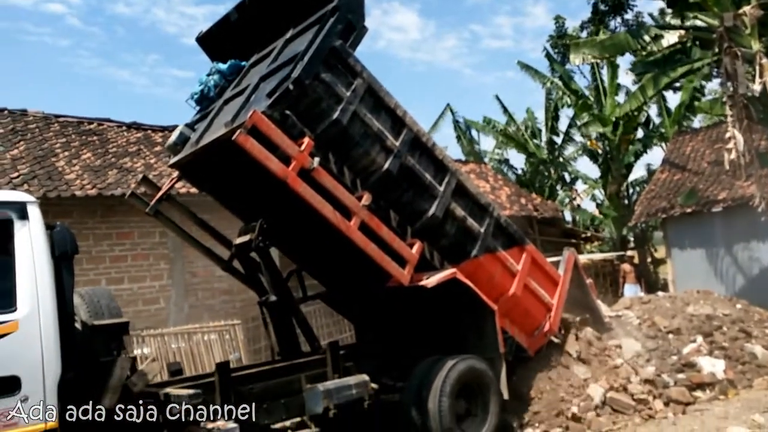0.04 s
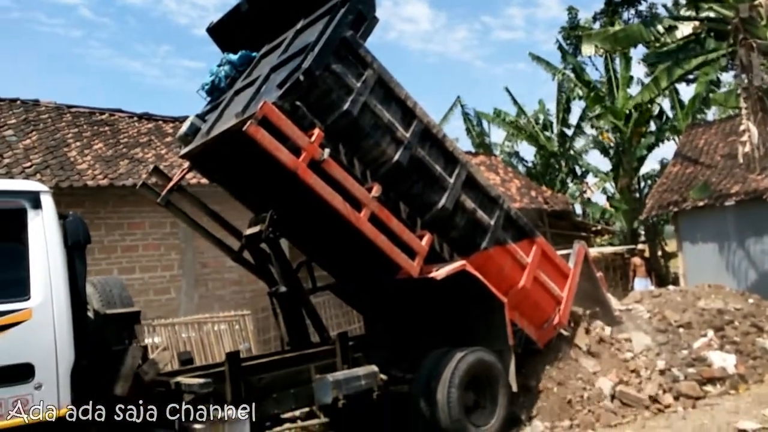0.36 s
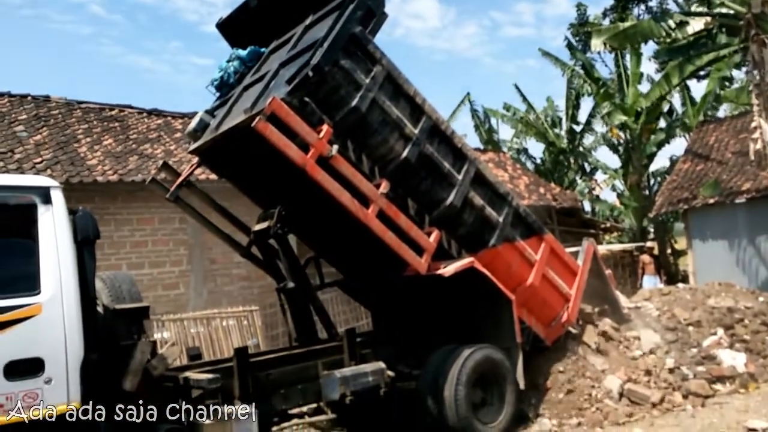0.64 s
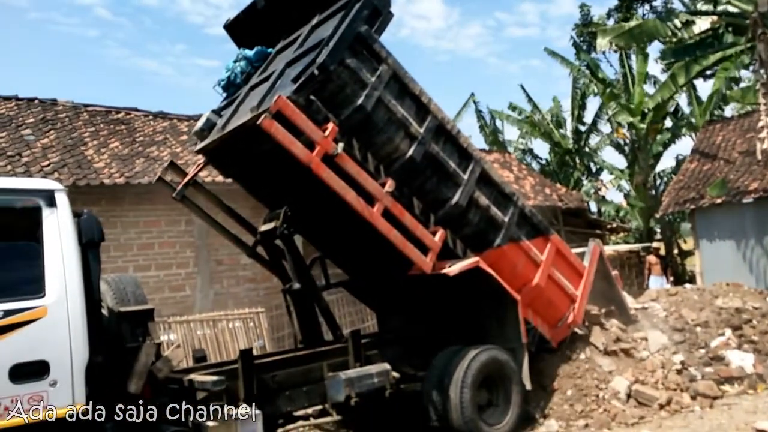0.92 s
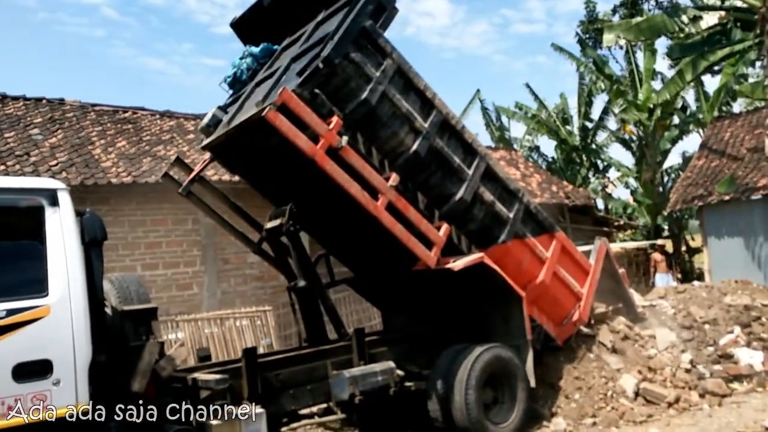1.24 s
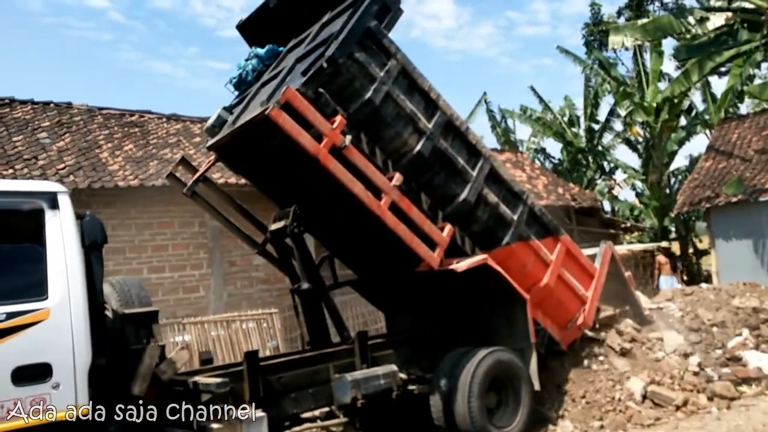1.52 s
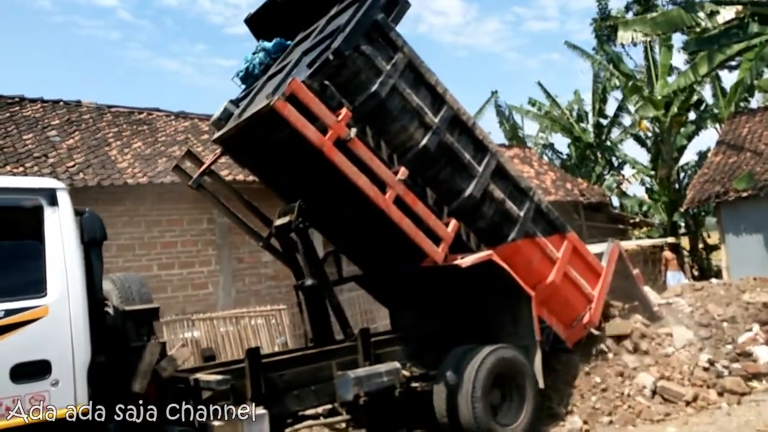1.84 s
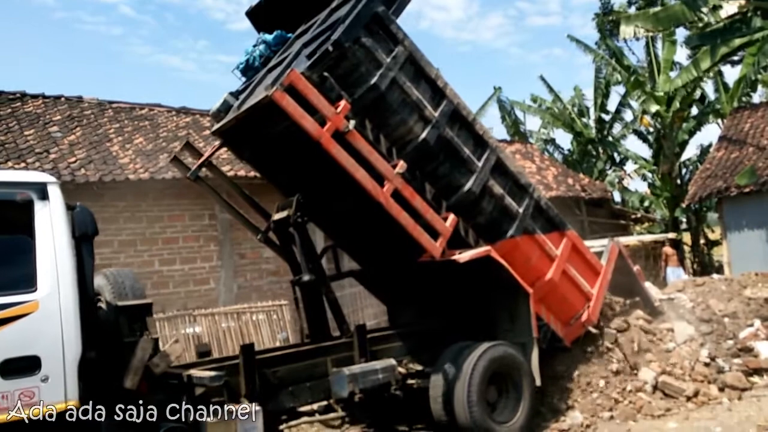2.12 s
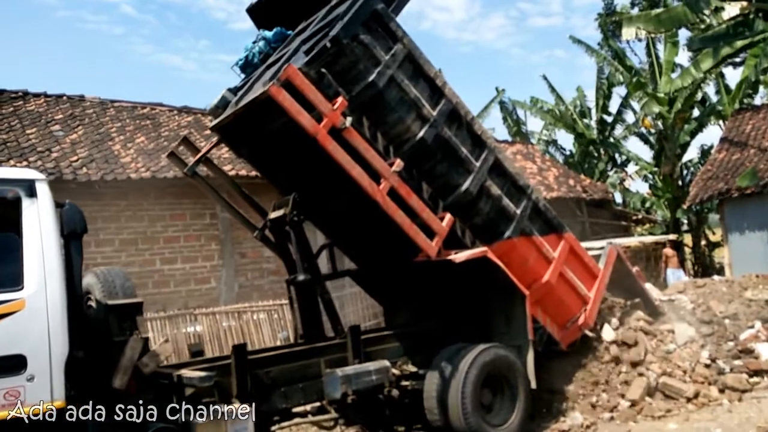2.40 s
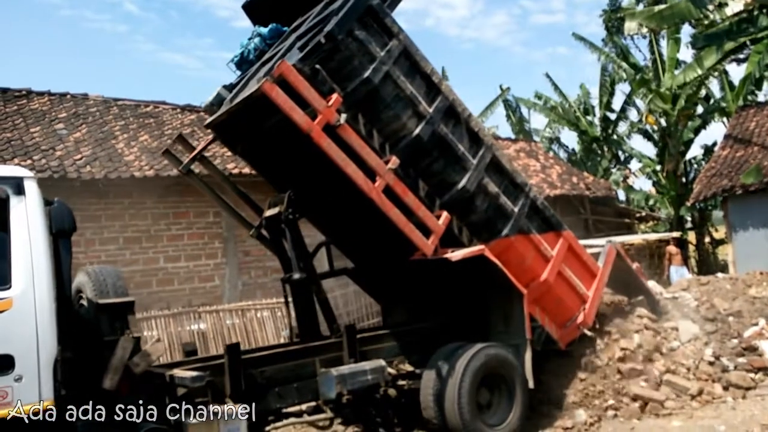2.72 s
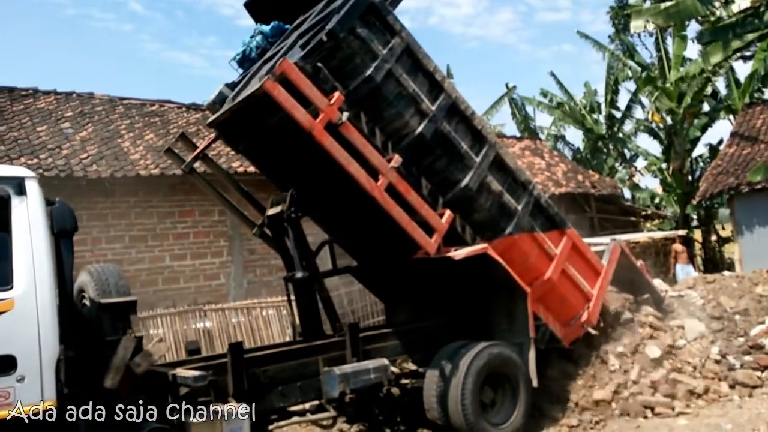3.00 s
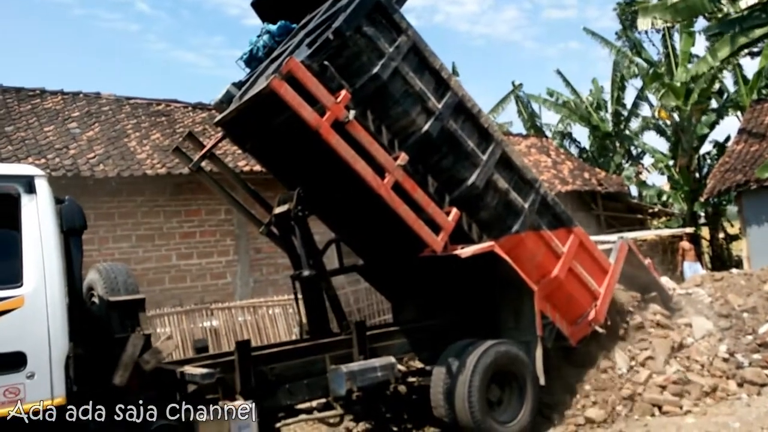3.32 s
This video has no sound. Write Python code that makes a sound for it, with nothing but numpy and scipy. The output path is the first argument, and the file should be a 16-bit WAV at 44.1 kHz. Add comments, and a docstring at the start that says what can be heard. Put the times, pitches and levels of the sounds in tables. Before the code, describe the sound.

Rubble slides off a tipper truck's steel bed outdoors, over a faint diesel idle. In the first second the bed groans briefly and gives dull thumps. Stones come loose around 1.2 seconds. From 1.7 seconds rubble and earth rush down, drumming and scraping, with gravel spraying and bricks clacking, fullest around 2.5 seconds. Heavy lumps knock the steel at about 3 and 3.2 seconds, then the flow dies away.

```python
"""A diesel tipper truck idles outdoors while the load on its raised steel bed thumps and groans.
A few stones come loose, then rubble and earth rush down, drumming, scraping and ringing the steel.
Gravel sprays over the tail, bricks clack and earth slumps onto the heap; the last big lumps drop
and the flow dies away. Nearby house walls give a short echo. The sound is mono, with a dull top."""
import sys
import numpy as np
from scipy import signal
from scipy.fft import rfft, irfft
from scipy.io import wavfile

SR = 44100
rng = np.random.default_rng(int(sys.argv[2]) if len(sys.argv) > 2 else 0)


def bounce(signal):
    """Save signal as a 16-bit WAV file at the path given by the first command-line argument."""
    frames = np.transpose(np.atleast_2d(signal))
    limited = np.clip(frames, -1, 1)
    pcm = np.round(limited * 32767).astype(np.int16)
    wavfile.write(sys.argv[1], SR, pcm)


N = 156555
T = np.arange(N) / SR
HIT_T = T[:SR // 2]  # half a second: the time axis of one hit


def undb(db):
    """Decibels to gain."""
    return 10 ** (np.asarray(db) / 20)


def unit(x):
    """Scale to rms 1."""
    return x / np.sqrt(np.mean(x ** 2))


def colour(x, points, size=8192):
    """Causal EQ through (Hz, dB) points, with an added treble roll-off; the result has rms 1."""
    hz, db = np.array(points, float).T
    freqs = np.maximum(np.fft.rfftfreq(size, 1 / SR), 1)
    gain = undb(np.interp(np.log(freqs), np.log(hz), db)) / (1 + (freqs / hz[-1] / 2) ** 2)
    cepstrum = irfft(np.log(gain))
    response = irfft(np.exp(rfft(2 * cepstrum[:size // 2], size)))  # minimum phase keeps attacks sharp
    return unit(signal.fftconvolve(x, response)[:N])


def noise(points):
    """Coloured noise of rms 1."""
    return colour(rng.standard_normal(N), points)


def wander(hz):
    """Smooth random motion of rms 1, up to about hz."""
    return unit(signal.sosfilt(signal.butter(2, hz, fs=SR, output="sos"), rng.standard_normal(N)))


def fade(t60):
    """An exponential decay that loses 60 dB in t60 seconds."""
    return np.exp(-np.log(1000) * HIT_T / t60)


def ring(hz, t60):
    """One struck mode."""
    return np.sin(2 * np.pi * hz * HIT_T) * fade(t60)


def contact(rise_s=0.0013):
    """A rounded attack: a crumbling stone or lump takes a moment to make full contact."""
    return 1 - np.exp(-(HIT_T / rise_s) ** 2)


def crack(hiss, t60):
    """Crumbling stone: a dying burst cut from a random place in the hiss."""
    return np.roll(hiss, rng.integers(N))[:len(HIT_T)] * fade(t60)


def grains(per_s, spread_db):
    """Random impacts; a positive spread makes a few stand out, a negative one makes a few weaker."""
    size = undb(spread_db * np.minimum(rng.exponential(size=N), 5))
    return (rng.random(N) < per_s / SR) * size * rng.choice([-1, 1], N)


def add(out, start, sound):
    """Mix a sound in at start seconds."""
    i = max(int(start * SR), 0)
    out[i:i + len(sound)] += sound[:max(N - i, 0)]


# The hum of the exhaust. Each row: multiple of the firing rate, level in dB.
EXHAUST_HARMONICS = [(3, -76.5), (4, -82.5), (5, -81), (7, -76)]
# The tone of the diesel clatter and of the block and chassis. Each row: frequency in Hz, gain in dB.
CLATTER_EQ = [(300, -15.5), (480, -1.5), (680, -19.5), (950, 1), (1250, -2), (1800, -17), (2600, -14),
              (3400, -12.5), (4700, -28.5), (5700, -20), (7000, -40), (8000, -50)]
RUMBLE_EQ = [(28, -41), (45, -8), (80, 0), (140, -8), (220, -3.5), (380, -9), (520, -10), (700, -28),
             (1000, -32)]

def engine(firing_hz=23.05, first_firing_s=0.04, burst_decay_s=0.0059):
    """Idling diesel: the exhaust hums, and each firing kicks up the clatter and the chassis rumble."""
    firings = (T - first_firing_s) * firing_hz
    burst = np.exp(-(firings % 1) / firing_hz / burst_decay_s)
    strength = undb(0.5 * rng.standard_normal(200))[np.floor(firings).astype(int) + 1]
    clatter, rumble = (0.67 + burst * strength) * rng.standard_normal((2, N))  # steady floor plus bursts
    exhaust = sum(undb(db) * np.sqrt(2) * np.sin(2 * np.pi * (harmonic * firings + rng.random()))
                  for harmonic, db in EXHAUST_HARMONICS)
    return exhaust + undb(-66) * colour(clatter, CLATTER_EQ) + undb(-62) * colour(rumble, RUMBLE_EQ)


# The swell and ebb of the sliding load.
# Each row: time in seconds, bed drumming in dB, rubble scraping in dB, grit hiss in dB.
FLOW_LEVELS = [(0, -57.5, -93, -70), (0.798, -71.5, -69.5, -85), (1.155, -58.5, -61.5, -72.5),
               (1.179, -39, -43, -81), (1.26, -52, -56, -67), (1.35, -51.5, -51, -72.5),
               (1.491, -60, -63, -72.5), (1.601, -48.5, -55, -66.5), (1.659, -63, -74, -68.5),
               (1.7, -43, -60, -56), (1.832, -42, -47.5, -61.5), (1.982, -43, -43.5, -54),
               (2.15, -40.5, -42, -54), (2.32, -44, -46, -51.5), (2.44, -39.5, -40, -45.5),
               (2.529, -32, -39.5, -47.5), (2.63, -37.5, -38.5, -45), (2.76, -37.5, -41, -49),
               (2.92, -38, -46, -51), (3.009, -37.5, -47.5, -58), (3.07, -46.5, -54, -60.5),
               (3.181, -54.5, -63, -68), (3.271, -47.5, -55, -70.5), (3.4, -55.5, -61.5, -70.5),
               (3.55, -60.5, -73, -71.5)]
# The tone of the drumming, the scraping and the hiss. Each row: frequency in Hz, gain in dB.
DRUM_EQ = [(40, -35.5), (110, -22.5), (145, -12.5), (180, -13), (240, -2.5), (290, 0), (335, 4),
           (390, -5.5), (450, -2.5), (520, -13.5), (900, -50.5)]
SCRAPE_EQ = [(350, -27), (600, -1), (700, 1.5), (760, 2), (815, 9), (900, 3), (1040, 1), (1250, -21.5),
             (1600, -17.5), (2400, -61)]
GRIT_EQ = [(900, 0.5), (1400, 0), (1830, -2), (1960, 3.5), (2250, -2.5), (2480, -5.5), (2850, -4.5),
           (3250, 5.5), (3800, -3), (4150, 1.5), (5200, -7), (5700, -7.5), (6900, -29.5), (7800, -51.5)]

def slide(clump_db=2.2, clump_hz=30):
    """Showers of lumps, stones and grit run over the steel in clumps."""
    times, drum_db, scrape_db, grit_db = np.array(FLOW_LEVELS).T
    showers = [(drum_db, grains(per_s=500, spread_db=3), DRUM_EQ),
               (scrape_db, grains(per_s=1500, spread_db=-1), SCRAPE_EQ),
               (grit_db, grains(per_s=4400, spread_db=-1), GRIT_EQ)]
    out = np.zeros(N)
    for db, hits, eq in showers:
        clumped = hits * undb(clump_db * wander(clump_hz))
        out += undb(np.interp(T, times, db)) * colour(clumped, eq)
    return out


# The ring of the steel bed. Each row: frequency in Hz, level in dB, time to fall 60 dB in seconds.
BED_MODES = [(421, -4, 0.13), (591, -10, 0.21), (693, -7.5, 0.14), (810.8, 4, 0.083), (994, -4, 0.029),
             (1448, -21, 0.22), (1950, -19.5, 0.15), (2467, -13.5, 0.086), (3266, -4, 0.044),
             (3455, -18.5, 0.055)]
# The bright crunch of crumbling stone. Each row: frequency in Hz, gain in dB.
CRACK_EQ = [(500, -1.5), (1000, 3.5), (1500, 10), (2500, 7), (3300, 12), (4500, 3.5), (5800, -4),
            (7000, -17.5), (7900, -41.5)]

def chunks(count=560, low_hz=750, high_hz=4200, longest_t60=0.056, rest_db=-71):
    """Loose chunks tumble with the flow, clicking and crunching; each rings the bed at its own spot."""
    out, onset, hiss = np.zeros(N), contact(), noise(CRACK_EQ)
    times, _, _, grit_db = np.array(FLOW_LEVELS).T
    steel_modes = np.array([undb(db - 2) * ring(hz, t60) for hz, db, t60 in BED_MODES])
    draws = rng.random((count, 4))
    spots = rng.standard_normal((count, len(BED_MODES)))  # how much each hit drives each mode
    for (when, pitch, softness, detune), spot in zip(draws, spots):
        start = when * N / SR
        hz = low_hz * (high_hz / low_hz) ** pitch
        t60 = longest_t60 * (1 - pitch / 2)  # small, high chunks ring most briefly
        push_db = np.interp(start, times, grit_db) + 3.5 - 2.9 * np.log(softness + 0.03)
        click = ring(hz, t60) - ring(hz * (1 + 0.2 * detune), t60)
        crunch = undb(-7) * crack(hiss, t60)
        if push_db > rest_db:  # weakly pushed chunks stay put
            add(out, start, undb(push_db) * onset * (click + crunch + spot @ steel_modes) / 2)
    return out


# Dull knocks on the bed.
# Each row: start in seconds, pitch in Hz, level in dB, time to fall 60 dB in seconds.
THUMPS = [(0.088, 229, -28.5, 0.12), (0.090, 350, -24.5, 0.02), (0.329, 217, -34.5, 0.086),
          (0.69, 337.6, -30.5, 0.13), (0.6976, 308, -13, 0.024), (.723, 371.6, -39.5, 0.12),
          (0.898, 274, -27, 0.027), (1.164, 315, -21.5, 0.048), (1.255, 330, -33.5, .06),
          (1.68, 333.6, -32, 0.12), (1.958, 282, -24.5, 0.049), (2.242, 299, -21.5, 0.042),
          (2.361, 264, -22.5, 0.057), (2.492, 345, -18, 0.082), (2.493, 143.4, -32, 0.19),
          (2.567, 296, -14, 0.024), (2.595, 331, -22.5, 0.094), (2.886, 293, -21, 0.057),
          (2.952, 298, -14.5, 0.056), (2.978, 272, -25, 0.11), (3.023, 315, -27.5, 0.061),
          (3.205, 348, -10.5, 0.045), (3.208, 423, -26, 0.14), (3.217, 252.4, -26, 0.16),
          (3.228, 320, -15, 0.03), (3.261, 232.6, -29.5, 0.11), (3.484, 360, -30, 0.029)]

def thumps():
    """Soft, heavy lumps push the loaded floor, which rings briefly."""
    out = np.zeros(N)
    for start, hz, db, t60 in THUMPS:
        add(out, start, undb(db) * ring(hz, t60) * contact(rise_s=0.0035))
    return out


# Short groans of the bed under the sticking load.
# Each row: start in seconds, rise in seconds, length in seconds, pitch in Hz, level in dB.
GROANS = [(0.094, 0.014, 0.11, 354, -25), (0.194, 0.016, 0.049, 383.4, -41),
          (0.235, 0.021, 0.096, 349, -40.5), (0.322, 0.022, 0.073, 423, -40)]
# The rough edge of a groan. Each row: frequency in Hz, gain in dB.
RASP_EQ = [(80, -20), (200, 4.5), (300, 8.5), (480, 0.5), (750, -15.5), (1050, -10), (1400, -29.5),
           (3000, -36), (6000, -49), (8000, -71)]

def groans(upper_hz=965, upper_db=-34.5, rasp_db=-9):
    """Stick-slip friction holds a low panel mode, with a weaker upper mode and some rasp."""
    out, rasp = np.zeros(N), undb(rasp_db) * noise(RASP_EQ)
    for start, rise, length, hz, db in GROANS:
        age = T - start
        attack = np.sin(np.pi / 2 * np.clip(age / rise, 0, 1))
        release = np.clip((length - age) / (length - rise), 0, 1) ** 1.07
        panel = np.sin(2 * np.pi * hz * age) + undb(upper_db) * np.sin(2 * np.pi * upper_hz * age)
        out += undb(db) * attack * release * (np.sqrt(2) * panel + rasp)
    return out


# Bricks knocking together on the heap. Each row: start in seconds, pitch in Hz, level in dB.
CLACKS = [(.562, 1050, -57), (.912, 1178, -52), (1.041, 945, -49.5), (1.088, 1180, -48.5),
          (1.163, 2616, -43.5), (1.186, 2774, -44), (1.204, 2856, -48), (1.251, 1240, -43.5),
          (1.341, 892, -45), (1.678, 3630, -37), (1.679, 2284, -39), (1.708, 3420, -42.5),
          (1.772, 1182, -40), (1.783, 922, -34), (1.932, 746, -42), (1.939, 3720, -46.5),
          (2.061, 2074, -41.5), (2.151, 3610, -47.5), (2.269, 3516, -32), (2.272, 1958, -36.5),
          (2.274, 735, -35), (2.284, 3154, -36), (2.34, 2090, -45), (2.435, 3650, -39.5),
          (2.73, 1974, -41.5), (2.835, 3170, -38.5), (2.942, 3330, -36.5), (3.091, 816, -39),
          (3.322, 824, -39), (3.329, 874, -35), (3.424, 845, -49), (3.502, 5010, -61)]
# The ring of one brick. Each row: ratio to its pitch, level in dB.
BRICK_MODES = [(0.631, -11.5), (0.937, -4.5), (1.001, -0.5), (1.282, -14.5)]

def clacks(t60=0.066, detune=0.016):
    """Bricks ring briefly when they meet; the small, high ones crunch the most."""
    out, hiss = np.zeros(N), noise(CRACK_EQ)
    for start, hz, db in CLACKS:
        brick = np.zeros(len(HIT_T))
        for ratio, mode_db in BRICK_MODES:
            polarity = rng.choice([-1, 1])
            mode_hz = hz * ratio * (1 + detune * rng.standard_normal())
            brick += undb(mode_db) * polarity * ring(mode_hz, t60)
        crunch = undb(-6) * min(hz / 3500, 1) ** 2 * crack(hiss, t60)
        add(out, start, undb(db) * contact() * (brick + crunch))
    return out


# A thin scrape that climbs as the load starts to move. Each row: time in seconds, pitch in Hz, level in dB.
WHISTLE_PATH = [(1.151, 5190, -89), (1.181, 5200, -69), (1.278, 5600, -78.5), (1.45, 5720, -96)]

def whistle(flutter_hz=340):
    """Friction whistles in a narrow, rising band of noise."""
    times, hz, db = np.array(WHISTLE_PATH).T
    level = np.interp(T, times, undb(db), left=0, right=0)
    phase = 2 * np.pi * np.cumsum(np.interp(T, times, hz)) / SR
    return level * wander(flutter_hz) * np.sqrt(2) * np.sin(phase)


# Hard hits of stone on steel. Each row: start in seconds, bed ring in dB, crack in dB.
STRIKES = [(1.164, -52, -51), (1.175, -41, -66), (1.772, -45.5, -50.5), (2.176, -37.5, -55),
           (2.412, -45, -41), (2.54, -34.5, -50), (2.594, -32, -38.5), (2.653, -36.5, -45.5),
           (2.976, -26.5, -32.5), (2.984, -28, -52), (2.997, -35, -60), (3.199, -38.5, -45),
           (3.205, -32, -44)]

def strikes(crack_t60=0.11):
    """Hard stones crack on the steel bed and ring its modes."""
    out, hiss = np.zeros(N), noise(CRACK_EQ)
    steel = sum((-1) ** k * undb(db) * ring(hz, t60) for k, (hz, db, t60) in enumerate(BED_MODES))
    for start, ring_db, crack_db in STRIKES:
        hit = undb(ring_db) * steel + undb(crack_db) * crack(hiss, crack_t60)
        add(out, start, contact() * hit)
    return out


# Heavy falls of earth. Each row: start in seconds, level in dB, time to fall 60 dB in seconds.
SLUMPS = [(1.184, -37, 0.21), (1.259, -47, 0.37), (1.95, -50.5, 0.54), (2.161, -39.5, 0.19),
          (2.489, -52.5, 0.27), (2.819, -42.5, 0.29), (3.21, -51.5, 0.72)]
# Their bass weight. Each row: frequency in Hz, gain in dB.
SLUMP_EQ = [(28, -32), (45, -8.5), (80, -0.5), (140, -1.5), (190, -0.5), (300, -21), (600, -48)]

def slumps(rise_s=0.018):
    """Each mass of earth lands on the heap with a deep, dying rumble."""
    level = np.zeros(N)
    for start, db, t60 in SLUMPS:
        age = np.maximum(T - start, 0)
        level += undb(db) * np.minimum(age / rise_s, 1) * np.exp(-np.log(1000) * age / t60)
    return level * noise(SLUMP_EQ)


# Quick spills of fine gravel. Each row: start in seconds, length in seconds, level in dB.
SPRAYS = [(1.686, 0.057, -53), (2.049, 0.089, -53), (2.404, 0.11, -51.5), (2.591, 0.063, -46)]
# Their sizzle. Each row: frequency in Hz, gain in dB.
SPRAY_EQ = [(1200, -13.5), (2200, -5), (3300, 6.5), (4200, 6), (6100, -4.5), (7000, -26), (7900, -42.5)]

def sprays():
    """Gravel spills over the tail of the bed in a dense patter that swells and ebbs."""
    level = sum(undb(db) * np.sin(np.pi * np.clip((T - start) / length, 0, 1))
                for start, length, db in SPRAYS)
    return level * colour(grains(per_s=1800, spread_db=3), SPRAY_EQ)


def wall_echo(x, echo_db=-18.5, t60=0.13, delay_s=0.018):
    """The direct sound plus scattered reflections from house walls a few metres off."""
    reflections = rng.standard_normal(len(HIT_T)) * (rng.random(len(HIT_T)) < 0.02)
    tail = reflections * fade(t60) * (HIT_T > delay_s)
    tail /= np.sqrt(np.sum(tail ** 2))
    return x + undb(echo_db) * signal.fftconvolve(x, tail)[:N]


def scene():
    """The rubble echoes off the walls while engine and earth stay dry; both channels are the same."""
    load = slide() + sprays() + chunks() + whistle() + groans() + thumps() + strikes() + clacks()
    mono = engine() + slumps() + wall_echo(load)
    return np.array([mono, mono])


def record(dry):
    """A steep low-pass at 13 kHz dulls the top."""
    return signal.sosfilt(signal.ellip(8, 0.2, 60, 13000, fs=SR, output="sos"), dry)


dry = scene()
out = record(dry)
bounce(out)
```